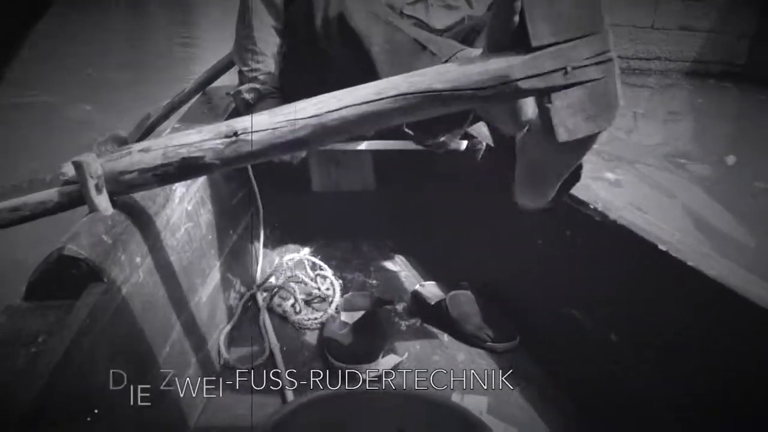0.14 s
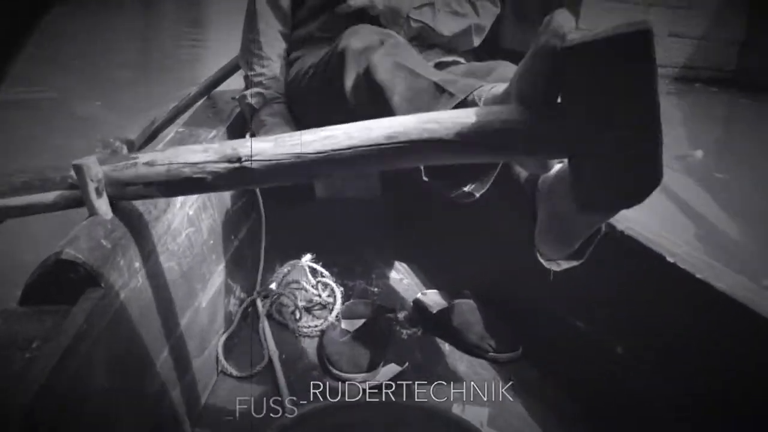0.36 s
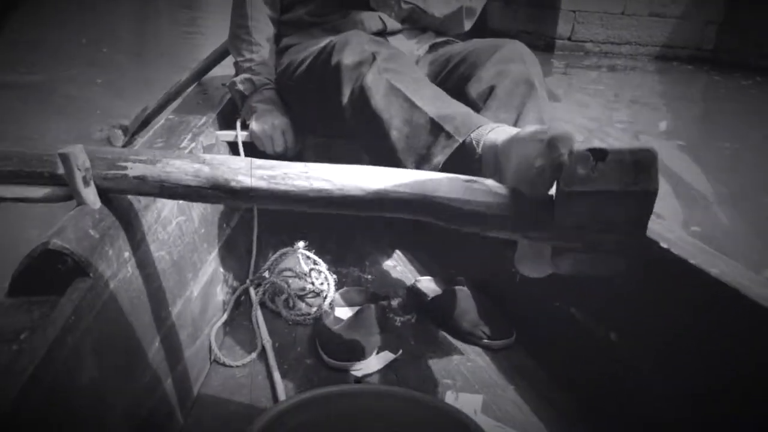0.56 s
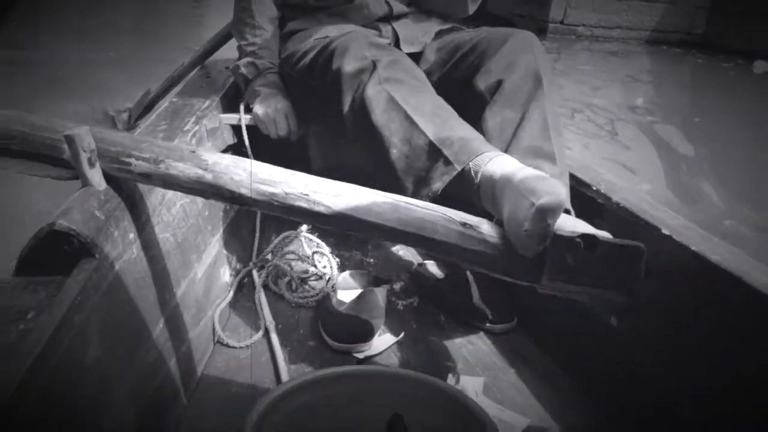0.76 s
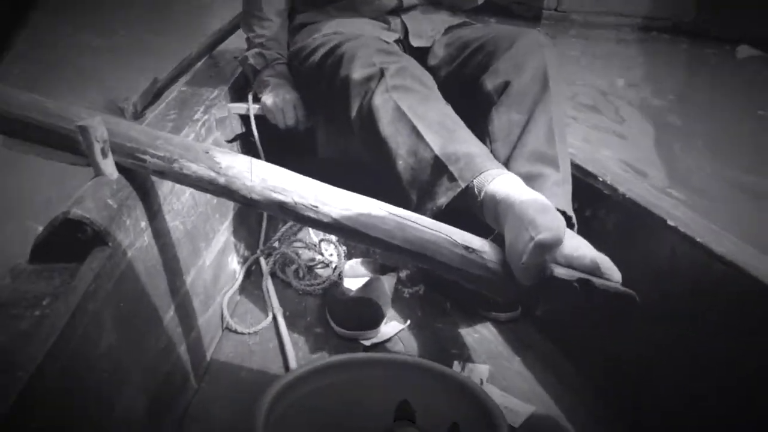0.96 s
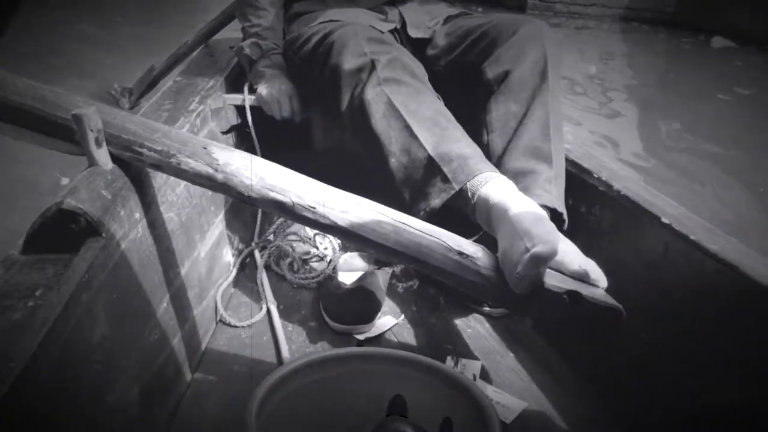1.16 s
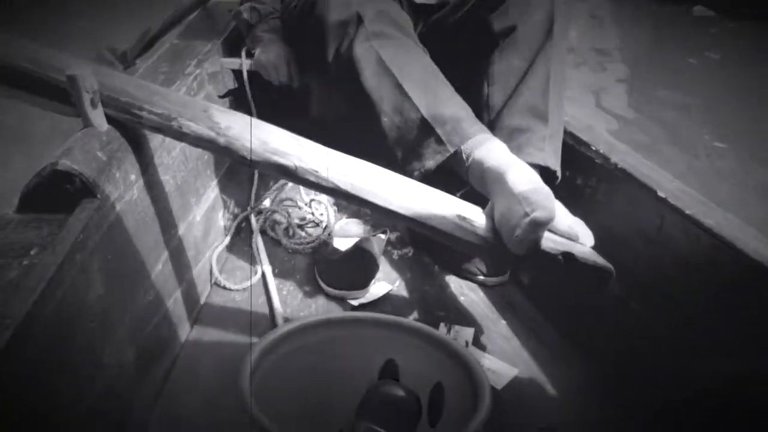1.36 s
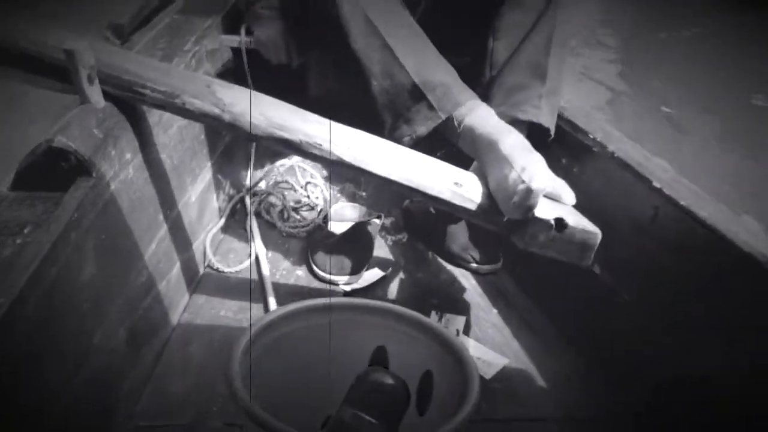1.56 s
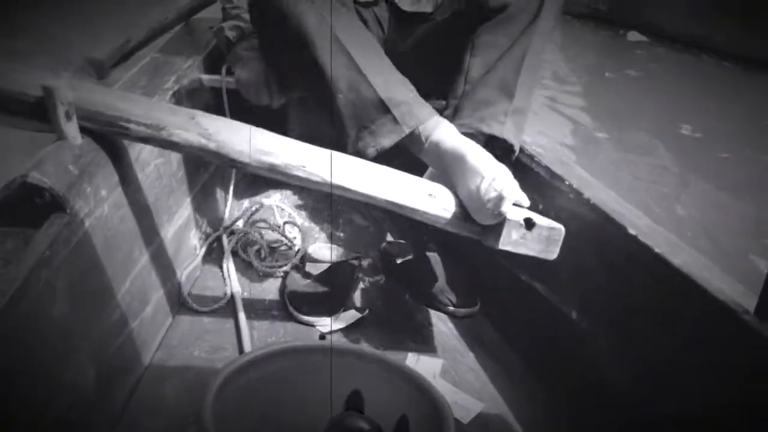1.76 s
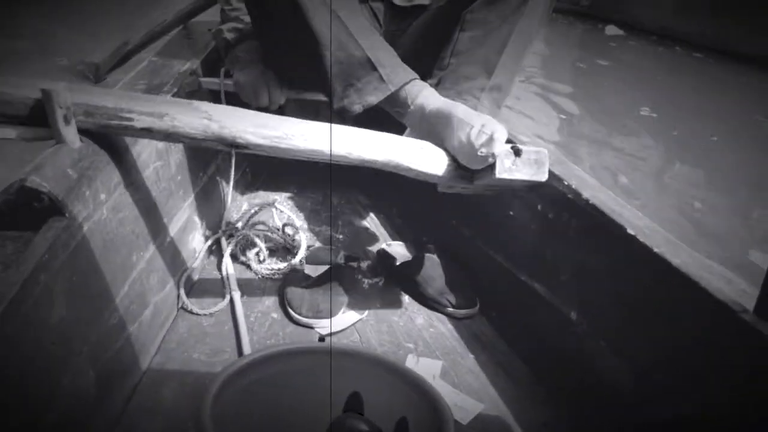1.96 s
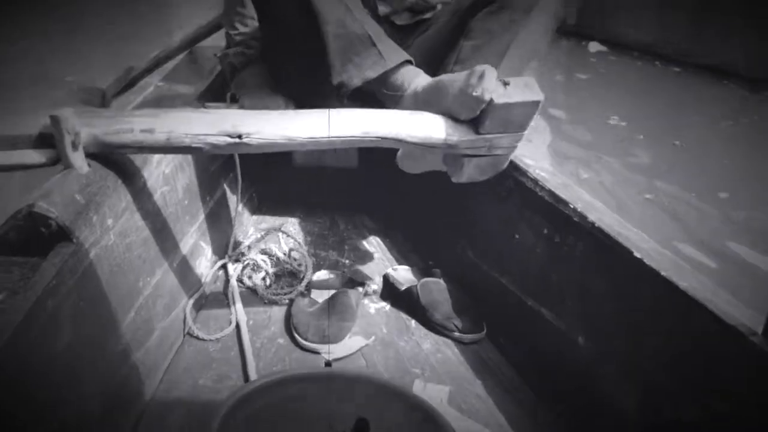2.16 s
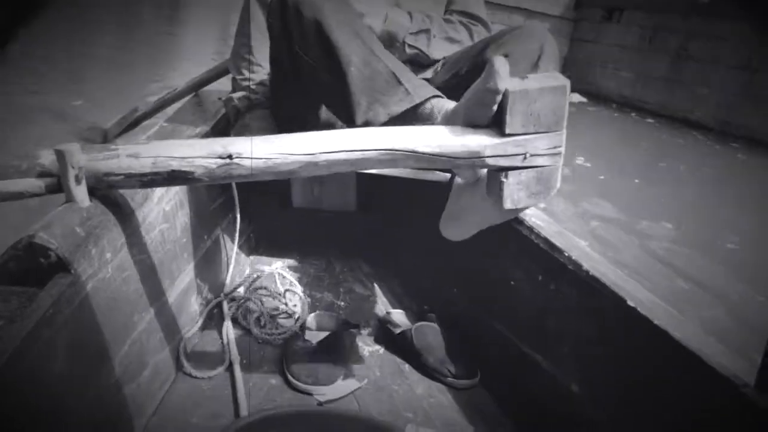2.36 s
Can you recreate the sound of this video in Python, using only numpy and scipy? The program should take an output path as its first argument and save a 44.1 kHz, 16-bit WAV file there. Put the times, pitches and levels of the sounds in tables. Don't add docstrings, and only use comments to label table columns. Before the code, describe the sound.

A dry wooden oar squeals harshly in its pivot and judders to rest, followed by faint rubs, two small snaps and a hollow hull knock, over soft canal wash, very close microphone overloading.

```python
import sys
import numpy as np
from scipy import signal
from scipy.fft import rfft, irfft
from scipy.io import wavfile
from scipy.ndimage import uniform_filter1d, minimum_filter1d

SR = 44100
rng = np.random.default_rng(int(sys.argv[2]) if len(sys.argv) > 2 else 0)


def inscribe(sig):
    pcm = np.round(np.clip(np.atleast_2d(sig).T, -1, 1) * 32767)
    wavfile.write(sys.argv[1], SR, pcm.astype(np.int16))


def ratio_of_db(decibels):
    return 10 ** (np.asarray(decibels, float) / 20)


N = 105840

# frequency in Hz, level in dB.
RUB_TONE = [(200, 5.5), (500, 0.5), (2000, 1), (4000, -11), (9000, -29), (11500, -31), (13500, -26),
            (15500, -41.5)]


def evened(x):
    return x / np.sqrt(np.mean(x ** 2) + 1e-20)


def smooth_noise(shape, size):
    return evened(uniform_filter1d(rng.standard_normal(shape), size=size))


def read(points, hz):
    f, value = np.transpose(points)
    return np.interp(np.log(hz + 1), np.log(f + 1), value)


def colour(x, points):
    gain = ratio_of_db(read(points, np.fft.rfftfreq(len(x), 1 / SR)))
    return evened(irfft(rfft(x) * gain, len(x)))


def band(x, hz, share):
    edges = [hz / (1 + share), hz * (1 + share)]
    return evened(signal.lfilter(*signal.butter(1, edges, "band", fs=SR), x))


def ring(modes, seconds, tilt_db=0., soft_s=.0006):
    t = np.arange(int(seconds * SR)) / SR
    tones = 0
    for hz, db, t60 in modes:
        level_db = db + tilt_db * np.log2(hz / 500) - 60 * t / t60
        tones = tones + ratio_of_db(level_db) * np.sin(2 * np.pi * hz * t)
    return (1 - np.exp(-(t / soft_s) ** 2)) * tones


def add(mix, s, sound, pan_db):
    part = mix[:, round(s * SR):][:, :len(sound)]
    part += sound[:part.shape[1]] * ratio_of_db(np.array([[pan_db / 2], [-pan_db / 2]]))


def wash():
    # frequency in Hz, level in dB.
    wash_tone = [(15, -47), (25, -22.5), (75, 5), (215, -4), (260, -7.5), (389, -4), (684, -5.5),
                 (871, -3.5), (15500, -50)]
    # time in seconds, level in dB.
    wash_level = [(0, -32.5), (.13, -33.5), (.5, -35.5), (.75, -41.5), (1.0, -37.5), (1.3, -38),
                  (1.6, -41.5), (1.9, -42), (2.1, -40.5), (2.4, -36.5)]
    # frequency in Hz, width in Hz, level in dB.
    hull_air = [(112, 43, -49.5), (256.3, 46, -47), (498.3, 19, -49.5), (716, 40, -58)]
    # frequency in Hz, likeness from 0 to 1.
    likeness = [(60, 1), (180, 0.96), (550, 0.96), (1650, 0.93), (4970, 0.054), (15000, 0.023)]
    # frequency in Hz, left over right in dB.
    balance = [(60, -3.5), (180, -4), (550, -1.5), (1650, 0), (4970, -1.5), (15000, 8)]
    patch_db, flicker_db = 2.2, .9
    drone_hz, drone_db = 499, -54

    frames, hz = N // 256 + 5, np.fft.rfftfreq(1024, 1 / SR)
    a, b, c, d, patches = rng.standard_normal((frames, 513, 5)).T
    patches = uniform_filter1d(patches, size=16, axis=0)
    patches = evened(uniform_filter1d(patches, size=6, axis=1))
    flicker = smooth_noise(frames, 3)
    same = np.clip(read(likeness, hz), -1, 1)[:, None]
    left = a + 1j * b
    right = same * left + np.sqrt(1 - same ** 2) * (c + 1j * d)
    lean = read(balance, hz)[:, None] / 2
    level_db = read(wash_tone, hz)[:, None] + patch_db * patches + flicker_db * flicker
    z = np.array([left, right]) * ratio_of_db(level_db + np.array([lean, -lean]))
    water = evened(signal.istft(z, nperseg=1024, noverlap=768)[1][:, :N])

    t = np.arange(N) / SR
    f, noise = np.fft.rfftfreq(N, 1 / SR), rfft(rng.standard_normal(N))
    hum = ratio_of_db(drone_db) * np.sin(2 * np.pi * drone_hz * t)
    for centre, width, db in hull_air:
        hum += ratio_of_db(db) * evened(irfft(noise / (1 + (2 * (f - centre) / width) ** 2), N))
    s, db = np.transpose(wash_level)
    return ratio_of_db(np.interp(t, s, db)) * water + hum


def drops():
    drops_per_s, drops_db = 340, -66.5
    out = np.zeros((2, N))
    for s, pitch, size, pan in rng.random((int(drops_per_s * N / SR), 4)):
        hz = 600 * 8.0 ** pitch
        t = np.arange(0, 30 / hz, 1 / SR)
        swell = hz * t * np.exp(-hz * t / 1.17)
        drop = np.sin(2 * np.pi * hz * t * (1 + 0.00204 * hz * t)) * swell
        level_db = drops_db - 3.85 * np.log(size + 0.027) - 14 * pitch
        add(out, s * N / SR, ratio_of_db(level_db) * drop, 12 * pan - 6)
    return out


def rubs():
    # start in seconds, length in seconds, level in dB, squeak in Hz, squeak level in dB.
    rub_events = [(0, 0.045, -39, 2240, -14), (0.557, 0.15, -48, 3390, -8.5),
                  (0.609, 0.121, -48.5, 1347, 4.5), (0.714, 0.24, -47, 2210, -10.5),
                  (0.987, 0.13, -47, 2500, -48), (1.425, 0.081, -41.5, 3620, -40),
                  (2.123, .11, -39.5, 3380, -12), (2.141, 0.077, -70.5, 13300, 7.5),
                  (2.146, 0.069, -73.5, 6530, 13), (1.43, .07, -80, 13300, 8),
                  (2.238, 0.049, -41, 1790, -8), (2.3, 0.056, -43, 1630, -2.5),
                  (2.375, .04, -36.5, 1380, 2.5)]
    edge_s, grains_per_s = 0.016, 5900
    out = np.zeros((2, N))
    grit = (rng.random(N + SR) < grains_per_s / SR) * rng.standard_normal(N + SR)
    grains = colour(grit, RUB_TONE)
    for s, length, db, hz, squeak_db in rub_events:
        t, at = np.arange(0, length, 1 / SR), round(s * SR)
        rise = t + edge_s * (s == 0)
        edge = np.clip(np.minimum(rise, length - t) / edge_s, 0, 1)
        squeak = band(band(grit[at:at + len(t)], hz, 0.12), hz, 0.12)
        add(out, s, ratio_of_db(db) * edge * (grains[at:at + len(t)] + ratio_of_db(squeak_db) * squeak), -1)
    return out


def ticks():
    # start in seconds, level in dB, centre in Hz, time to fall 60 dB in seconds.
    tick_events = [(.001, -29.5, 190, 0.4), (0.091, -30, 318, 0.25), (.42, -55.5, 5000, .01),
                   (.573, -39, 3350, 0.0077), (0.758, -46, 4100, 0.03), (0.979, -32.5, 3340, 0.027),
                   (0.98, -32.5, 377, 0.14), (1.217, -60, 3700, .01), (1.185, -49, 4470, 0.02),
                   (1.238, -54.5, 9200, 0.0047), (1.433, -40.5, 4840, 0.013), (1.605, -51.5, 8700, 0.024),
                   (1.993, -17.5, 767, 0.11), (1.698, -46.5, 3150, 0.022), (0.396, -51, 5760, .01),
                   (0.821, -47.5, 4240, .02), (1.991, -45, 2200, 0.031), (2.006, -31, 3660, 0.012),
                   (2.113, -45, 3500, 0.026), (2.254, -38, 2150, 0.033)]
    width = .4
    out, t = np.zeros((2, N)), np.arange(5000) / SR
    for s, db, hz, t60 in tick_events:
        burst = band(band(rng.standard_normal(5000), hz, width), hz, width)
        add(out, s, ratio_of_db(db - 60 * t / t60) * burst, 0)
    return out


def squeal():
    # time in seconds, slips per second in Hz, level in dB, roughness 0-1.
    course = [
        (.13, 640, -60, .8),
        (.141, 600, -13, .8),
        (.15, 546, -3.5, .6),
        (.165, 527, -3, .4),
        (.174, 493, -3, .18),
        (.203, 478, -2.5, .11),
        (.214, 438, -3, .14),
        (.238, 443, -2.5, .03),
        (.291, 420, -2.5, .04),
    ]
    # time in seconds, dip in dB.
    stumbles = [
        (.1735, 8),
        (.212, 12),
    ]
    # frequency in Hz, level in dB.
    shaft = [(860, -13), (1100, -8), (1450, -23), (1750, -18), (2170, -17.5), (2430, -26), (2950, -24),
             (4400, -38)]
    # frequency in Hz, level in dB.
    rasp_tone = [(220, -25), (500, 2.5), (1050, 6.5), (1500, 0), (2200, 1.5), (3000, -7), (7000, -52),
                 (15000, -56)]
    stumble_s, let_go_db_per_s = .003, 4004
    top_db, top_slope_db = -45, -1.5
    waver_db, fizz = 2.5, .065

    t, (s, hz, db, rough) = np.arange(SR // 2) / SR, np.transpose(course)
    rough = np.interp(t, s, rough)
    miss = sum(dip * np.exp(-((t - at) / stumble_s) ** 2) for at, dip in stumbles)
    pitch = np.interp(t, s, hz)
    turns = np.cumsum(pitch * (1 + .07 * rough * smooth_noise(len(t), 120))) / SR

    overtones = [(k, read(shaft, k * pitch)) for k in range(2, 11)]
    overtones += [(k, top_db + top_slope_db * (k - 11)) for k in range(11, 34)]
    waver = evened(uniform_filter1d(smooth_noise((32, len(t)), 400), size=400))
    waver = waver * (waver_db + 5 * rough)
    tones = ratio_of_db(-miss) * np.cos(2 * np.pi * turns)
    for (k, level_db), w in zip(overtones, waver):
        phase = .1 * w + .7 + .5 * (k - 2) ** 2
        tones += ratio_of_db(level_db + w) * np.cos(2 * np.pi * k * turns + phase)

    puffs = 0.1 + np.exp(-(turns % 1) / 0.028)
    rasp = colour(puffs * rng.standard_normal(len(t)), rasp_tone)
    level_db = np.interp(t, s, db, -120) - let_go_db_per_s * np.maximum(t - s[-1], 0)
    sound = np.sqrt(2) * tones + (fizz + .5 * rough + 0.0078 * miss) * rasp
    return np.pad(ratio_of_db(level_db) * sound, (0, N - len(t)))


def judder():
    # time in seconds, level in dB.
    course = [
        (0.288, -44.5),
        (.296, -8),
        (.33, -7),
        (0.346, -11),
        (.365, -17),
        (.395, -23),
        (.407, -31),
        (.5, -41),
    ]
    # frequency in Hz, level in dB, time to fall 60 dB in seconds.
    oar_modes = [(137.1, -13, 0.12), (263.4, -5.5, 0.14), (397.3, 12, 0.049), (539, 2.5, 0.075),
                 (622.5, 9.5, 0.068), (714, 1.5, 0.16), (815, 3, 0.072), (1090, -0.5, 0.094),
                 (1213, 0.5, 0.046), (1562, -3.5, 0.052), (2012, -3, 0.038), (2240, -4.5, 0.036),
                 (3840, -30, 0.0069)]
    slips_per_s, chatter_end_s, chatter_fade_db_per_s = 1000, 0.3415, 501
    bounce_hz, bounce_db, bounce_jitter, bounce_tilt_db = 127, -1, .15, -3
    rasp_db, rasp_end_s = -9, 0.321

    t, (s, db) = np.arange(N) / SR, np.transpose(course)
    slips = (rng.random(N) < slips_per_s / SR) * rng.standard_normal(N)
    chatter = evened(signal.oaconvolve(slips, ring(oar_modes, 0.26, soft_s=0.00084))[:N])
    chatter *= ratio_of_db(-np.clip(chatter_fade_db_per_s * (t - chatter_end_s), 0, 12))

    bounce_rate = bounce_hz * (1 + bounce_jitter * smooth_noise(N, 300))
    bounces = np.diff(np.floor(np.cumsum(bounce_rate) / SR), prepend=0)
    bounce = evened(signal.oaconvolve(bounces, ring(oar_modes, 0.26, bounce_tilt_db))[:N])

    rasp = colour(rng.standard_normal(N), RUB_TONE)
    rasp = rasp * ratio_of_db(rasp_db - 900 * np.maximum(t - rasp_end_s, 0))
    sound = chatter + ratio_of_db(bounce_db) * bounce + rasp
    sound = ratio_of_db(np.interp(t, s, db, -120, -120)) * sound
    return signal.lfilter(*signal.butter(3, 110, "high", fs=SR), sound)


def knocks():
    # start in seconds, level in dB, brightness in dB per octave, left over right in dB.
    knock_events = [
        (.982, -36, 4.5, 3),
        (1.9915, -21, -2, 4),
        (1.997, -9.5, 1, -1.5),
        (2.006, -26, -6.5, -8),
        (2.016, -27, -2, 5),
        (2.253, -40, -2, 2),
    ]
    # frequency in Hz, level in dB, time to fall 60 dB in seconds.
    hull_modes = [(257, -14, .12), (450, -10, .05), (552, -15, .1), (690, -8, .09), (722, -6, .09),
                  (845, -2, .13), (1040, -8, .06), (1250, -9, .05), (1400, -9, .04), (1590, -7, .04),
                  (1733, -12, .03), (2120, -5, .025), (2350, -7, .02), (2890, -14, .01)]
    blow_s = 0.00011
    out, t = np.zeros((2, N)), np.arange(400) / SR
    for s, db, tilt_db, pan_db in knock_events:
        blow = np.exp(-t / blow_s) * (1 + 1.08 * rng.standard_normal(400))
        blow = blow / np.linalg.norm(blow)
        add(out, s, ratio_of_db(db) * np.convolve(ring(hull_modes, .4, tilt_db), blow) / 3, pan_db)
    return out


def thuds():
    # start in seconds, level in dB.
    thud_events = [
        (0.982, -27.5),
        (1.999, -15),
        (2.012, -15.5),
        (2.024, -11),
        (2.078, -23),
        (2.253, -25),
    ]
    # frequency in Hz, level in dB, time to fall 60 dB in seconds.
    boat_modes = [(69.5, -1, 0.16), (89.4, 0.5, 0.18), (108, -1, 0.16), (142, -5.5, 0.41),
                  (185.5, -7.5, 0.22), (256.2, -13, 0.39)]
    out = np.zeros((2, N))
    for s, db in thud_events:
        add(out, s, ratio_of_db(db) * ring(boat_modes, .4, soft_s=0.0028) / 2, -1.5)
    return out


def snaps():
    # start in seconds, level in dB, brightness in dB per octave, left over right in dB.
    snap_events = [
        (1.1827, -16, 0, -1),
        (1.2955, -19, -4, 3),
    ]
    # frequency in Hz, level in dB, time to fall 60 dB in seconds.
    peg_modes = [(1370, -6, .012), (1660, -2, .012), (1900, -4, .012), (2450, -9, .012), (2780, -3, .022),
                 (3800, -10, .008), (4700, -14, .01), (5800, -11, .009), (7250, -7, .007)]
    out = np.zeros((2, N))
    for s, db, tilt_db, pan_db in snap_events:
        add(out, s, ratio_of_db(db) * ring(peg_modes, .04, tilt_db, soft_s=.0001), pan_db)
    return out


def walls(x):
    t60 = .12
    fade = ratio_of_db(-60 * np.arange(8000) / SR / t60)
    taps = rng.choice([-1., 0, 1], (2, 8000), p=[1 / 40, 38 / 40, 1 / 40]) * fade
    taps = signal.lfilter(*signal.butter(1, 900, "high", fs=SR), taps)
    return signal.fftconvolve(x, taps / np.linalg.norm(taps[0]), axes=1)[:, :N]


def ports(x):
    port_db, port_hz, port_s, sway_samples = -1, 4000, .008, 400
    taps = rng.standard_normal(600) * ratio_of_db(-60 * np.arange(600) / SR / port_s)
    sway = evened(uniform_filter1d(smooth_noise(N, sway_samples), size=sway_samples))
    scattered = signal.oaconvolve(x.mean(0), taps / np.linalg.norm(taps))[:N]
    side = sway * signal.lfilter(*signal.butter(1, port_hz, "high", fs=SR), scattered)
    return x + ratio_of_db(port_db) * np.array([side, -side])


def scene():
    wall_db = -15
    oar = (squeal() + judder()) * ratio_of_db(np.array([[-.2], [.2]]))
    oar = oar + rubs() + ticks() + knocks() + thuds() + snaps()
    return ports(oar + ratio_of_db(wall_db) * walls(oar) + drops()) + wash()


def roll_off(x):
    return signal.sosfilt(signal.butter(12, 15690, fs=SR, output="sos"), x)


def record(dry):
    hiss_db, hiss_hz, limit = -67, 3000, 1.37
    peaks = -minimum_filter1d(-abs(dry).max(0), size=200)
    over = np.maximum(peaks / limit, 1)
    hiss = band(rng.standard_normal(dry.shape), hiss_hz, 1.4)
    held = (dry + ratio_of_db(hiss_db) * hiss) / uniform_filter1d(over, size=200)
    clipped = held / (1 + abs(held) ** 12) ** (1 / 12)
    return roll_off(clipped)


dry = scene()
out = record(dry)
inscribe(out)
```